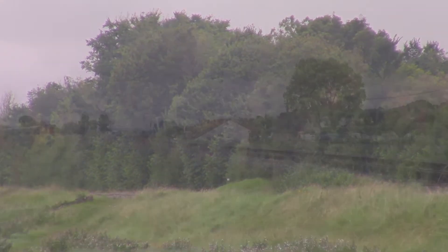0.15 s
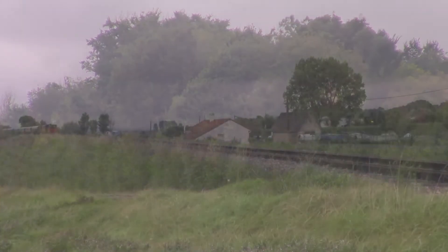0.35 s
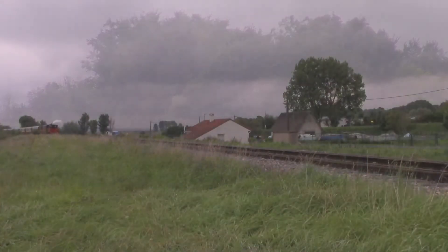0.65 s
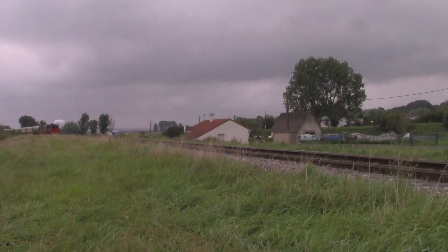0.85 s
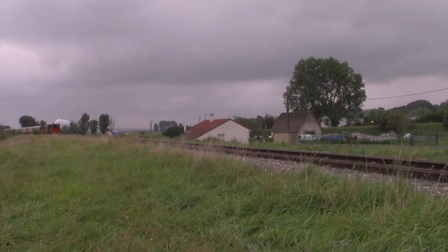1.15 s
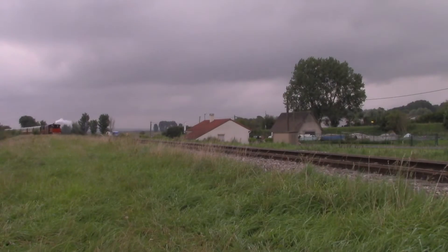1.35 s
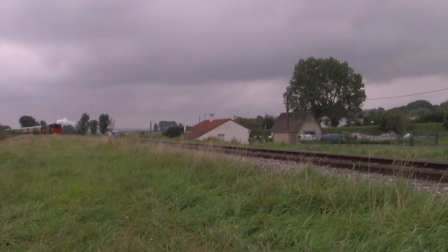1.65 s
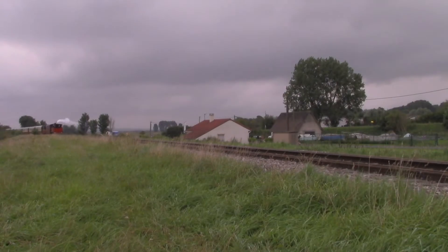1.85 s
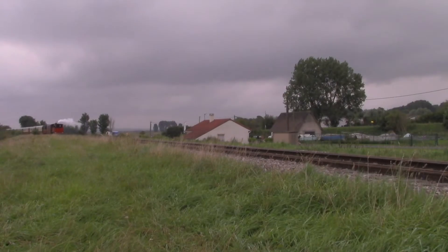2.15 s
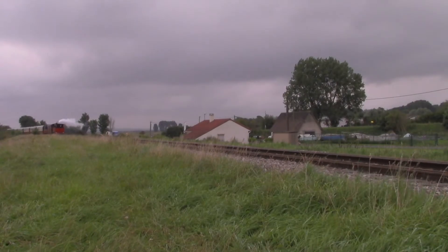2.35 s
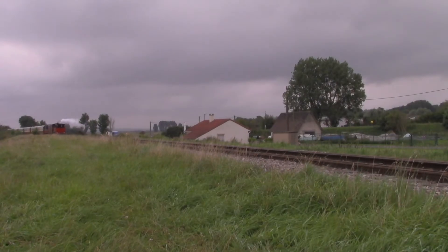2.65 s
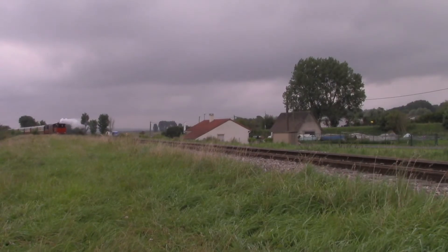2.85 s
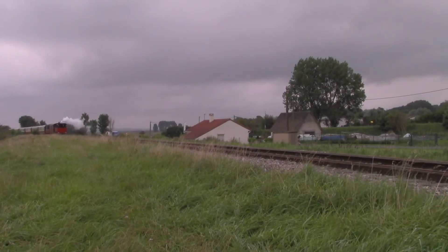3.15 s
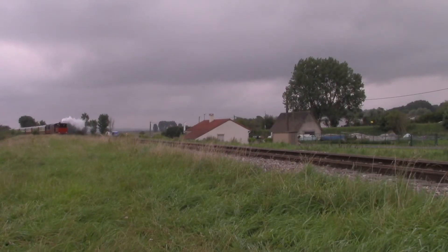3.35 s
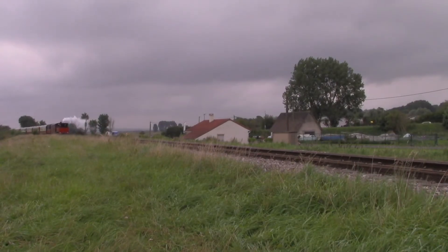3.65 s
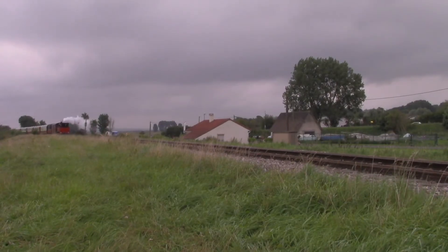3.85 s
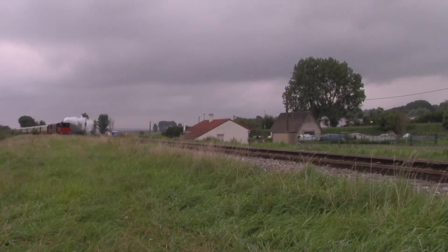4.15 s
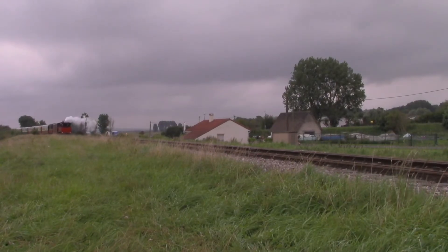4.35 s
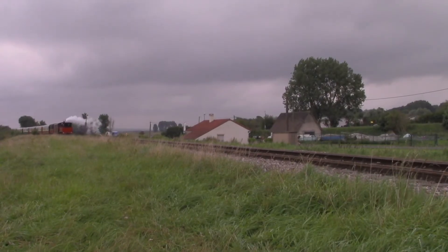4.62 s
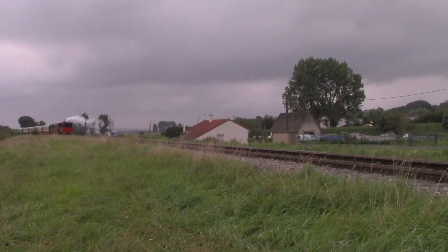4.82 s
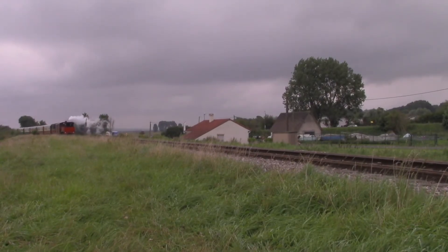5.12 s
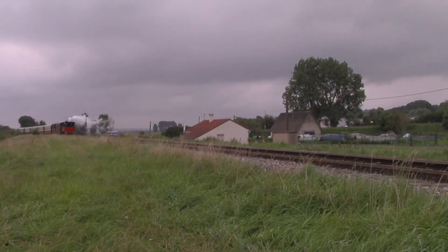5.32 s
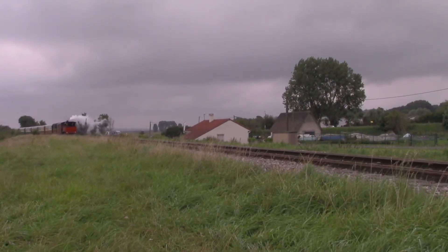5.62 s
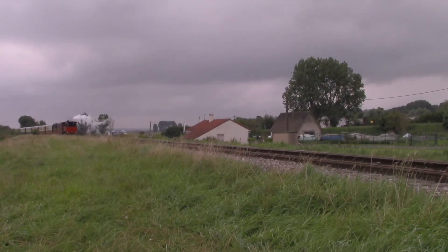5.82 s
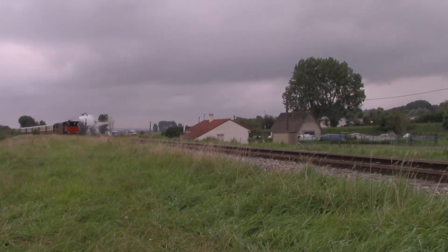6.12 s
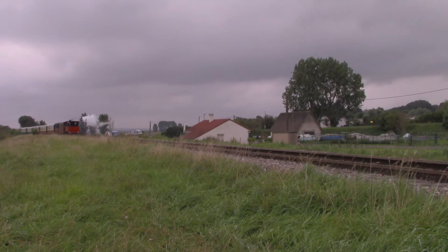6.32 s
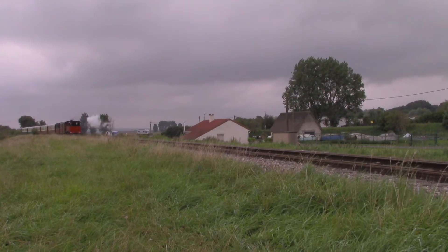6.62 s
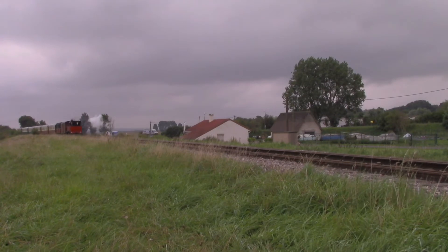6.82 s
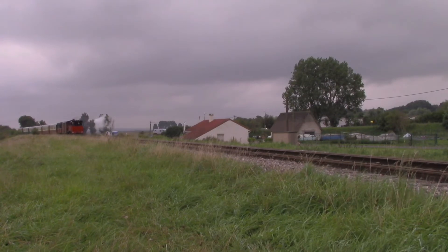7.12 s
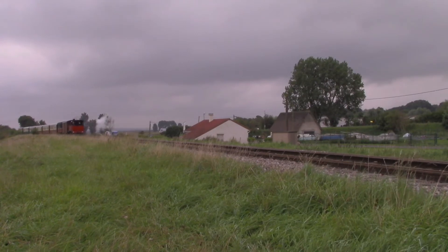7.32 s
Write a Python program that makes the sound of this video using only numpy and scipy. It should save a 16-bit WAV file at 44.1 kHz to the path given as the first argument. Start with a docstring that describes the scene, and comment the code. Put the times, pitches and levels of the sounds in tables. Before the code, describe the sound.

Wind thumps the microphone, steam hisses, then a high steam whistle sounds four blasts, its echo fading over a faint distant train.

```python
"""Wind buffets the microphone first, hardest in the opening second, over the far rolling of a train.
Steam hisses, then an approaching steam locomotive blows four blasts on one whistle: long, short, long, short.
Each blast is a stack of harmonics that scoops up as the valve opens and sags as it shuts; shaped noise is its
steam. A house, far trees and the open fields return echoes. Wind and train are noise shaped in pitch and level."""
import sys
import numpy as np
from scipy import signal
from scipy.fft import rfft, irfft, next_fast_len
from scipy.io import wavfile
from scipy.ndimage import uniform_filter1d, map_coordinates

SR = 44100
rng = np.random.default_rng(int(sys.argv[2]) if len(sys.argv) > 2 else 0)


def to_wav(s):
    """Save 16-bit WAV."""
    ch = np.atleast_2d(s).T  # columns
    pcm = np.round(np.clip(ch, -1, 1) * 32767)  # PCM
    wavfile.write(sys.argv[1], SR, pcm.astype(np.int16))


N = 329868
TIME = np.arange(N) / SR


def amp(db):
    """Decibels to amplitude."""
    return 10 ** (np.asarray(db) / 20)


def unit(x):
    """Scale to an rms of 1."""
    return x / np.sqrt(np.mean(x ** 2) + 1e-20)


def along(points, hz):
    """Read (pitch_hz, value) points on a log pitch axis."""
    f, v = np.transpose(points)
    return np.interp(np.log(hz + 1), np.log(f + 1), v)


def curves(rows):
    """One value per sample for each column after the time."""
    s, *cols = np.transpose(rows)
    return [np.interp(TIME, s, c) for c in cols]


def ramp(start, length):
    """From 0 at start to 1 after length."""
    return np.clip((TIME - start) / length, 0, 1)


def gate(rows, fade):
    """Open from the first row's time to the last, with soft edges."""
    return ramp(rows[0][0], fade) * np.clip((rows[-1][0] - TIME) / fade, 0, 1)


def bump(s, length):
    """A brief bell-shaped swell around time s."""
    return np.exp(-.5 * np.minimum(np.abs(TIME - s) / length, 10) ** 2)


def wobble(rate):
    """A smooth random curve, rate knots a second."""
    knots = rng.standard_normal(int(N * rate / SR) + 4)
    return map_coordinates(knots, [TIME * rate])


def filtered(x, response):
    """Shape x by a response of frequency."""
    m = next_fast_len(N + SR // 4)
    return irfft(rfft(x, m) * response(np.fft.rfftfreq(m, 1 / SR)), m)[..., :N]


def rush(spectrum, side_db, patchy_db):
    """Stereo noise of rms 1 with drifting patches of gain."""
    z = signal.stft(rng.standard_normal((2, N)), nperseg=512)[2]
    patches = rng.standard_normal(z.shape[1:])
    patches = uniform_filter1d(patches, size=12, axis=0)  # smooth across pitch
    patches = uniform_filter1d(patches, size=16, axis=1)  # then across time
    pair = signal.istft(z * amp(patchy_db * unit(patches)), nperseg=512)[1][:, :N]
    mid, side = filtered(pair, lambda hz: amp(along(spectrum, hz)))
    side = side * amp(side_db)
    return unit(np.array([mid + side, mid - side]))


# how the driver eases the first blast open; the last value holds after it: time_s, missing_pressure_share
EASING = [(.75, 0.72), (1.0, .44), (1.16, .43), (1.35, 0.16), (1.5, 0.12), (1.9, 0.049), (2.5, -0.016),
          (2.85, -0.021)]
OPEN_S = .024  # time constant of the pressure's arrival


def missing(opens, shuts, closing):
    """Steam pressure still missing as the valve opens and shuts, as a share of full pressure."""
    opening_lack = np.exp(-np.abs(TIME - opens) / OPEN_S)
    closing_lack = np.exp(-np.abs(shuts - TIME) / closing)
    return opening_lack + closing_lack + curves(EASING)[0]


# pulls of the whistle cord: open_s, shut_s, tone_build_s, closing_s,
# full_pitch_hz (before scoop and droop), steam_db (relative)
CORD_PULLS = [(0.735, 2.828, 0.65, 0.0278, 1123, 0), (2.928, 3.228, 0.0095, 0.0098, 1118, -1),
              (3.369, 5.317, 0.012, .014, 1123, 1), (5.465, 5.8, 0.0072, 0.011, 1123, 8)]
# the bell's partials: harmonic_number, level_db, loss_db (with all pressure missing), flicker_db, flicker_knots_per_s
# the first three stand against their own level, the rest against the mean of octave and third
BELL_PARTIALS = [(1, -0.79, 10.5, 0.28, 88), (2, 0.47, 22.5, 0.9, 70), (3, 1.1, 8, 4, 330),
                 (4, -14, 17, 4, 420), (5, -21.5, 26, 3.9, 340), (7, -38, 30, 0.5, 240)]
# harmonics as the moving air carries them, one table a long blast: time_s, fundamental_db, octave_db, third_db
LONG_BLAST_LEVELS = [
    [(1.42, -16, -29, -55), (1.464, -17.5, -26, -48), (1.726, -17.5, -27.5, -51),
     (1.874, -15.5, -26.5, -40.5), (2.042, -16.5, -24.5, -40.5), (2.132, -24, -28.5, -36.5),
     (2.356, -13.5, -30, -38.5), (2.49, -18, -25.5, -45), (2.65, -17.5, -22, -36.5), (2.76, -16, -25, -43)],
    [(3.46, -12.5, -29, -43.5), (3.708, -11.5, -24, -49), (3.804, -13, -26, -43.5),
     (4.128, -13.5, -19.5, -38.5), (4.436, -17, -29.5, -44), (4.566, -15, -22.5, -45),
     (4.76, -17.5, -27.5, -44), (4.964, -17.5, -23, -49), (5.194, -15.5, -28.5, -56),
     (5.25, -18, -30.5, -47)],
]
# the same for the short blasts: time_s, fundamental_db, octave_db, third_db
SHORT_BLAST_LEVELS = [
    [(2.975, -14, -30, -35.5), (3.187, -14.5, -28.5, -57), (3.195, -15, -28.5, -54)],
    [(5.52, -20.5, -31, -41.5), (5.614, -16.5, -31, -41), (5.76, -18.5, -27.5, -48)],
]
SCOOP_HZ, DROOP_HZ_PER_S = 111, 2.4  # flatness with all pressure missing; a held blast slowly sinks
BUILD_POWER, LATER = 1.93, 1.3  # growth is this power of time; overtones follow by harmonic number ** LATER
FADING_DB = 0.83  # slow fading in the air, this much more for each harmonic above the first
UNSTEADY_DB = 4.5  # a tone short of pressure swells and falters
BEHIND_PITCH = .977  # pitch ratio of the sound sent backwards


def whistle():
    """The bell sings in harmonics: as sent ahead, and sent backwards, where the engine's motion lowers it."""
    ahead, behind = np.zeros(N), np.zeros(N)
    waver = 1 + 0.001 * wobble(30) + 0.0031 * wobble(260)  # the turbulent jet shakes the pitch
    flicker = [depth_db * wobble(rate) + FADING_DB * (k - 1) * wobble(9)
               for k, _, _, depth_db, rate in BELL_PARTIALS]
    falter_db = UNSTEADY_DB * curves(EASING)[0] * wobble(14)
    tones = [LONG_BLAST_LEVELS[0], SHORT_BLAST_LEVELS[0], LONG_BLAST_LEVELS[1], SHORT_BLAST_LEVELS[1]]
    for (opens, shuts, build, closing, full_hz, _), tone in zip(CORD_PULLS, tones):
        on = (TIME > opens) & (TIME < shuts)
        lack = missing(opens, shuts, closing)
        hz = full_hz - SCOOP_HZ * lack - DROOP_HZ_PER_S * (TIME - opens)
        phase = 2 * np.pi * np.cumsum((hz * waver)[on]) / SR
        grown = ramp(opens, build)[on] ** BUILD_POWER
        valve = 1 - ramp(shuts - .006, .006)[on]
        first_db, octave_db, third_db = curves(tone)
        upper_db = (octave_db + third_db) / 2
        levels = [first_db, octave_db, third_db, upper_db, upper_db, upper_db]
        for (k, db, loss_db, _, _), level_db, shake_db in zip(BELL_PARTIALS, levels, flicker):
            k = round(k)
            partial_db = (level_db + db - loss_db * lack + shake_db + falter_db)[on]
            size = np.sqrt(2) * valve * grown ** (k ** LATER) * amp(partial_db)
            ahead[on] += size * np.sin(k * phase)
            behind[on] += size * np.sin(k * phase * BEHIND_PITCH)
    return ahead, behind


# colour of the thin steam hiss: pitch_hz, level_db (per Hz, relative)
HISS_COLOUR = [(1500, -19), (2300, 3.5), (3000, 7), (4200, 1.5), (5300, 4), (6400, 0), (8000, 1),
               (10000, -1.5), (11200, -9), (12500, -20.5), (15500, -24.5)]
# colour of the steam roar around the bell: pitch_hz, level_db (per Hz, relative)
ROAR_COLOUR = [(400, -31), (800, -16), (1000, 4), (1400, 0.5), (2000, 1), (2550, 0), (2950, 8),
               (3400, -0.5), (4200, -1), (6500, -43), (12000, -49.5)]
# jet strength in the two long blasts; the short ones take it over: time_s, roar_db, hiss_db (before the trims)
JET_FLOW = [
    [(0.54, -33, -49.5), (0.71, -59, -52.5), (1.17, -57.5, -59.5), (1.26, -40.5, -55), (1.75, -37.5, -53.5),
     (2.07, -36.5, -41.5), (2.32, -39, -49.5), (2.64, -38, -44.5), (2.77, -40, -49.5)],
    [(3.44, -44, -49), (3.516, -42, -45), (3.672, -42, -51), (3.966, -37.5, -42), (4.498, -40, -48),
     (4.726, -40, -53), (4.9, -40, -51), (5.194, -45, -55), (5.26, -49.5, -54.5)],
]
# breathy singing of the jet on the lip before the bell speaks fully: time_s, centre_hz, level_db
LIP_EDGE = [(.85, 2760, -80), (1.0, 2910, -51.5), (1.14, 3190, -45.5), (1.24, 3550, -53.5),
            (1.33, 3800, -68)]
ROAR_DB, HISS_DB = -0.84, 5.5  # trims against the jet strength
STEAM_CRACKS_S, ROAR_LOSS_DB = 0.49, 29.5  # valve first cracks; roar lost if EASING lacks all pressure
STEAM_OPEN_S, STEAM_SHUT_S, STEAM_LAG_S = 0.047, 0.069, 0.046  # the jet swells, dies, and outlasts the tone
STEAM_AHEAD_S = 0.011  # on a later pull the jet starts just ahead of the tone


def steam():
    """The jet hisses as soon as the valve cracks, sings on the lip, and roars around the bell at full pressure."""
    starts = [STEAM_CRACKS_S] + [row[0] - STEAM_AHEAD_S for row in CORD_PULLS[1:]]
    valve = 0
    for start, (_, shuts, *_, db) in zip(starts, CORD_PULLS):
        dying = ramp(shuts + STEAM_LAG_S - STEAM_SHUT_S, STEAM_SHUT_S)
        valve = valve + amp(db) * ramp(start, STEAM_OPEN_S) * (1 - dying)
    roar_db, hiss_db = curves(np.vstack(JET_FLOW))
    spurts_db = 0.18 * wobble(14) + .5 * wobble(60)
    hiss = amp(hiss_db + HISS_DB + spurts_db) * rush(HISS_COLOUR, side_db=-39.5, patchy_db=2.5)
    roar_db = roar_db + ROAR_DB - ROAR_LOSS_DB * curves(EASING)[0] + spurts_db
    roar = amp(roar_db) * rush(ROAR_COLOUR, side_db=-52.0, patchy_db=0.8)
    edge_hz, edge_db = curves(LIP_EDGE)
    turn = 2 * np.pi * np.cumsum(edge_hz) / SR
    edge = amp(edge_db) * (wobble(850) * np.sin(turn) + wobble(850) * np.cos(turn))  # a narrow band of noise
    return (hiss + roar) * valve + edge * gate(LIP_EDGE, fade=.05)


# tone colour that every echo takes on: pitch_hz, gain_db
RETURN_COLOUR = [(1100, -2.5), (2250, -3.5), (3400, -1), (10000, 5)]


def wall(x, delay):
    """One echo from a house, fading in and out in the moving air."""
    late = np.interp(TIME - delay + .00006 * wobble(11), TIME, x, left=0)
    return filtered(late, lambda hz: amp(along(RETURN_COLOUR, hz))) * amp(2.8 * wobble(17))


# the far trees soak up the overtones: pitch_hz, gain_db
LEAF_DAMPING = [(1100, -1), (2250, -2), (3400, -4.5), (5600, -9)]


def copse(x, delay, spread):
    """A far stand of trees returns a smeared, ragged echo."""
    returns = rng.standard_normal(SR) * bump(delay, spread)[:SR]
    echo = signal.fftconvolve(x, returns / np.linalg.norm(returns))[:N]
    echo = filtered(echo, lambda hz: amp(along(RETURN_COLOUR, hz) + along(LEAF_DAMPING, hz)))
    return echo * amp(4.6 * wobble(24))


# how long the scattered echoes ring: pitch_hz, t60_s
RING_TIMES = [(500, 1.4), (1100, 3.77), (2300, 2.84), (4500, 1.3), (10000, .45)]


def landscape(x, delay, rise):
    """Scattered returns from far trees and houses; the air takes the treble first."""
    hz, t, z = signal.stft(rng.standard_normal(3 * SR), SR, nperseg=256)
    decay_db = 60 * t / along(RING_TIMES, hz)[:, None]
    fall = amp(along(RETURN_COLOUR, hz)[:, None] - decay_db) * np.clip((t - delay) / rise, 0, 1)
    fall /= np.sqrt(np.sum(fall ** 2, axis=1).max() * (t[1] - t[0]) * SR)
    tail = signal.istft(z * fall, SR, nperseg=256)[1]
    return signal.fftconvolve(x, tail)[:N]


GUST_RISE_S, GUST_FALL_S = 0.049, 0.04  # time constants of attack and release


def gust(starts, ends):
    """Attack, hold and release of one gust."""
    before, after = np.maximum(starts - TIME, 0), np.maximum(TIME - ends, 0)
    return np.exp(-before / GUST_RISE_S - after / GUST_FALL_S)


# gusts at the microphone, before swell and filters: start_s, end_s, buffet_db, flutter_db (against the buffet)
WIND_GUSTS = [(0.099, 0.158, -26, -13), (0.173, 0.213, -28, -6), (0.265, .31, -32.5, -9),
              (.35, 0.456, -39, 5.5), (0.564, 0.69, -38.5, 8), (0.736, 1.104, -42.5, 8.5),
              (1.146, 1.255, -44, -13), (1.373, 1.466, -49.5, -24), (1.63, 3.112, -46, -10.5),
              (3.248, 3.38, -48.5, -11), (3.53, 3.611, -49, -5), (3.746, 3.947, -45, -5.5),
              (3.999, 4.02, -40.5, -4.5), (4.482, 4.478, -53.5, -5), (4.8, 5.05, -62, -9),
              (5.212, 5.344, -51.5, -9.5), (6.46, 6.567, -48.5, -26), (6.88, 7.278, -52, -14)]
# colour of the low buffets: pitch_hz, level_db (per Hz, relative)
BUFFET_COLOUR = [(25, -36), (55, -30), (90, -14), (140, -0.5), (230, 2), (330, -0.5), (480, -8.5),
                 (800, -38.5), (2000, -86.5)]
# colour of the brighter flutter: pitch_hz, level_db (per Hz, relative)
FLUTTER_COLOUR = [(65, -38.5), (120, -19), (250, -1.5), (380, 1.5), (550, 2.5), (750, -3.5), (1100, -13),
                  (1800, -37.5), (6000, -65)]
# colour of the crackle: pitch_hz, level_db (per Hz, relative)
CRACKLE_COLOUR = [(400, -23), (900, 16), (1600, 10), (2400, 3), (3500, -18.5), (6000, -44.5), (12000, -41)]
# sharp slaps of wind, before the filters: time_s, level_db, pitch_hz, length_s (bell width)
WIND_SLAPS = [(0.109, -15.5, 263, 0.0036), (.291, -18, 370, 0.0016), (.299, -24.5, 298, 0.0041),
              (0.345, -25.5, 480, 0.0018), (.895, -27.5, 346, 0.01), (4.483, -41.5, 380, 0.0041),
              (5.328, -38, 380, 0.0027), (6.511, -37.5, 228, 0.005), (7.147, -47, 263.4, 0.0072),
              (7.21, -41.5, 194, .007)]
# the opening stretch, where the wind is wider, crackles more and leans left: time_s, opening_share
OPENING_WIND = [(.3, 0.89), (.6, 0)]
# the microphone's wind filter: pitch_hz, gain_db
WIND_FILTER = [(25, -15), (60, 2), (120, 0.5)]
# large eddies reach both ports alike: pitch_hz, side_gain_db
EDDY_WIDTH = [(70, -19.5), (140, -3), (260, -1.5)]
LULL_DB = -71  # the breeze between gusts
CRACKLE_DB, OPENING_CRACKLE_DB = -24.5, 11  # against the flutter; more in the opening half second


def wind():
    """Eddies at the microphone: low buffets, a brighter flutter, crackle and a few sharp slaps."""
    low, bright = amp(LULL_DB), 0
    for starts, ends, db, flutter_db in WIND_GUSTS:
        force = amp(db) * gust(starts, ends)
        low, bright = np.maximum(low, force), np.maximum(bright, force * amp(flutter_db))
    opening = curves(OPENING_WIND)[0]
    side_db = -35 + 29 * opening
    eddies, stagger, swell_db = wobble(60), wobble(250), 0.31 * wobble(19)
    flutter = rush(FLUTTER_COLOUR, side_db, patchy_db=6)
    air = low * amp(swell_db + 1.8 * eddies) * rush(BUFFET_COLOUR, side_db, patchy_db=2.04)
    air += bright * amp(1.0 * eddies + 1.97 * wobble(200)) * flutter
    crackle_db = CRACKLE_DB + OPENING_CRACKLE_DB * opening + 2.4 * eddies + 4.5 * wobble(260)
    air += bright * amp(crackle_db) * rush(CRACKLE_COLOUR, side_db, patchy_db=1.5)
    for s, db, hz, length in WIND_SLAPS:
        swirl = np.sin(2 * np.pi * hz * (TIME - s) + 0.68 * stagger) + 0.45 * flutter
        air += amp(db) * bump(s, length) * swirl
    left, right = filtered(air, lambda hz: amp(along(WIND_FILTER, hz)))
    mid = (left + right) / 2
    side = filtered((left - right) / 2, lambda hz: amp(along(EDDY_WIDTH, hz)))
    lean_db = np.outer([1, -1], 0.31 * opening)  # louder on the left
    return np.array([mid + side, mid - side]) * amp(lean_db)


# colour of the rolling train and the fields: pitch_hz, level_db (per Hz, relative)
FAR_COLOUR = [(35, -34), (70, -11.5), (135, -6), (250, -16.5), (480, -12), (700, -6.5), (1000, 0),
              (1350, -4), (2000, -9), (3100, -8.5), (4300, -14), (7500, -18), (11000, -31), (15500, -42)]
# a faint tick close by: time_s, level_db, length_s (bell width)
CLOSE_TICK = (6.833, -57, .005)
FAR_DB = -57.5  # base level, moved by the level curve


def distance():
    """One noise bed carries the train's far rolling and a faint rustle of grass, with one small tick."""
    level_db = np.interp(TIME, [.3, .7, 6, 7.4], [-5.0, 6.5, 5.0, 4.5])
    s, db, length = CLOSE_TICK
    click = unit(filtered(rng.standard_normal(N), lambda hz: hz > 4000))
    tick = amp(db) * bump(s, length) * click
    return amp(FAR_DB + level_db + 0.45 * wobble(6)) * rush(FAR_COLOUR, side_db=-40, patchy_db=1.0) + tick


# house and tree echoes sink and return as the echoing houses come into line: time_s, gain_db
ECHO_OPENNESS = [(1, 6.5), (3.2, -9), (4.2, -24), (4.7, -14), (5.3, 3.5), (6.5, 1.5)]
WALL_DB, COPSE_DB, FIELDS_DB, BEHIND_DB = -13.5, -19, -18.5, -23.5  # house, far trees, fields ahead and behind
WALL_JET_DB = -5  # the house returns less of the steam than of the tone


def scene():
    """Whistle and steam with their echoes, the wind and the far train."""
    ahead, behind = whistle()
    jet = steam()
    jet_mono = jet.mean(axis=0)
    sent = ahead + jet_mono
    near = amp(WALL_DB) * wall(ahead + amp(WALL_JET_DB) * jet_mono, delay=.165)
    far = amp(COPSE_DB) * copse(behind, delay=0.5866, spread=0.045)
    fields = amp(FIELDS_DB) * landscape(sent, delay=0.034, rise=0.055)
    fields += amp(BEHIND_DB) * landscape(behind, delay=0.17, rise=.18)
    fields *= amp(3 * wobble(26))  # the wind makes the long tail flutter
    echoes = amp(curves(ECHO_OPENNESS)[0]) * (near + far) + fields
    return ahead + jet + echoes + wind() + distance()


# how far the microphone's two ports differ: pitch_hz, side_db
PORT_DIFFERENCE = [(1100, -69.5), (2200, -56), (4500, -31), (9000, -26.5), (12500, -7.5)]
TOP_HZ = 15700  # band limit


def record(dry):
    """Short waves reach the two ports out of step; nothing passes above the band limit."""
    side = filtered(dry.mean(axis=0), lambda hz: 1j * amp(along(PORT_DIFFERENCE, hz)))  # a quarter turn
    return filtered(dry + np.array([side, -side]), lambda hz: hz < TOP_HZ)


dry = scene()
out = record(dry)
to_wav(out)
```